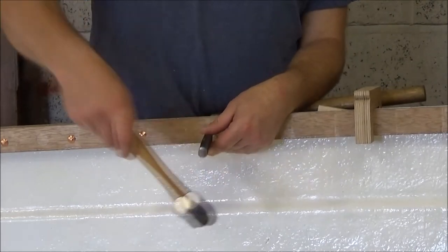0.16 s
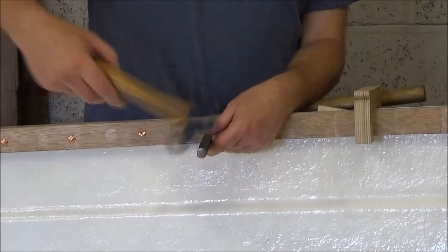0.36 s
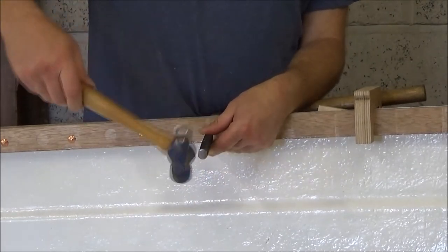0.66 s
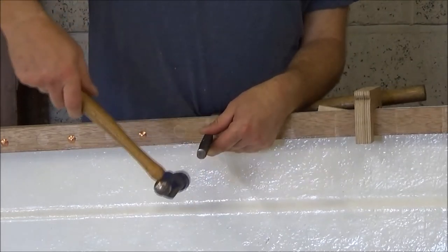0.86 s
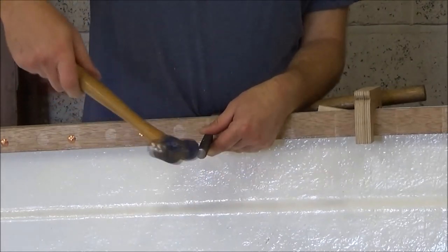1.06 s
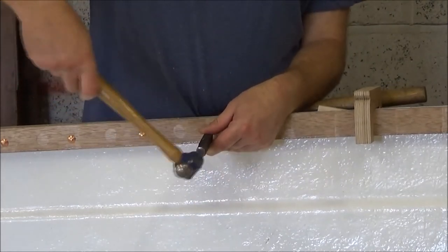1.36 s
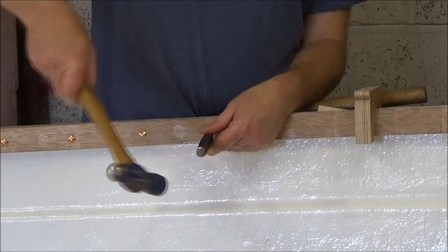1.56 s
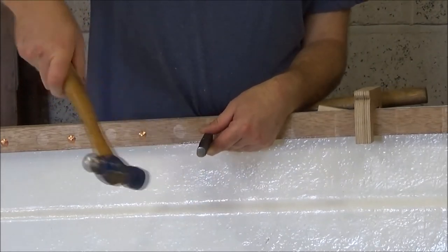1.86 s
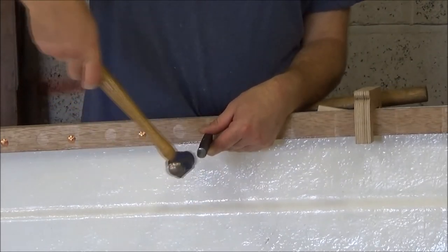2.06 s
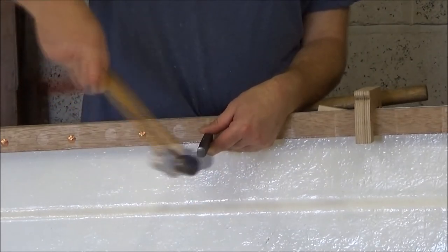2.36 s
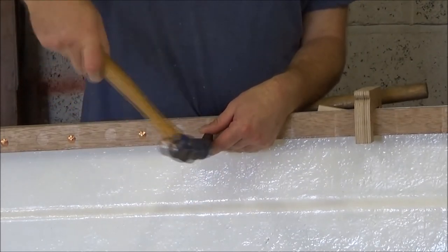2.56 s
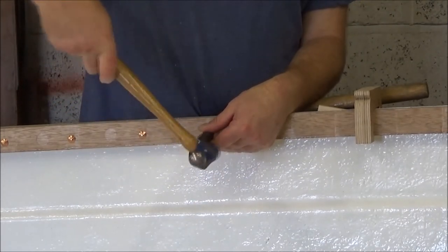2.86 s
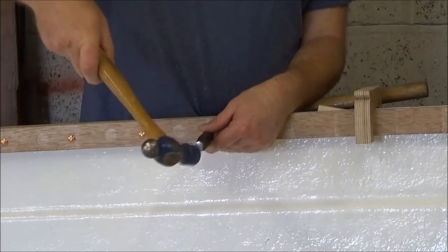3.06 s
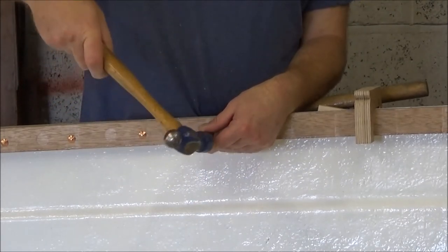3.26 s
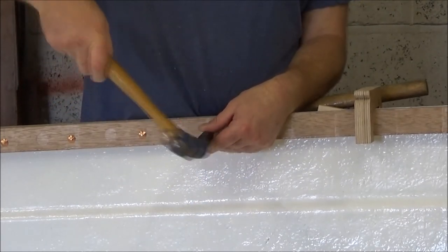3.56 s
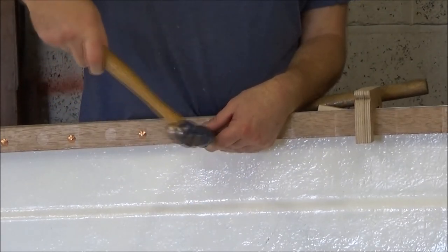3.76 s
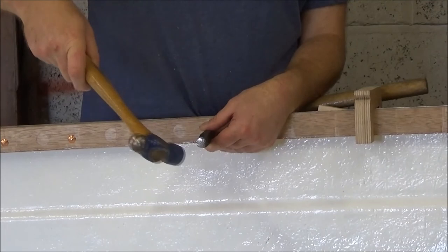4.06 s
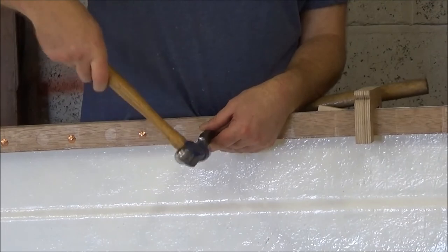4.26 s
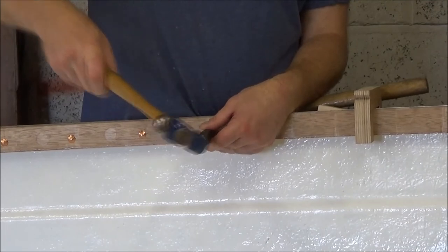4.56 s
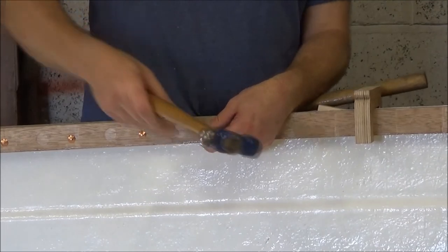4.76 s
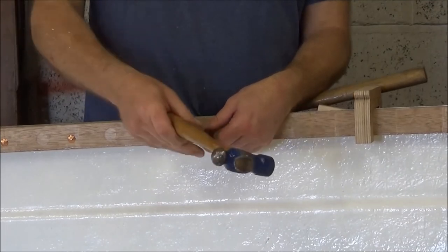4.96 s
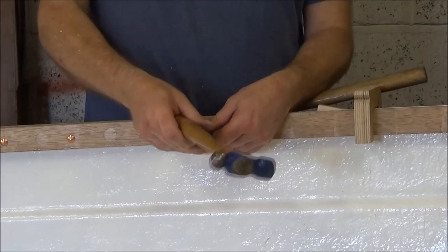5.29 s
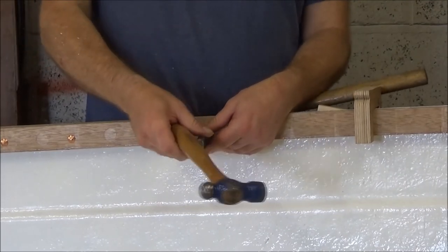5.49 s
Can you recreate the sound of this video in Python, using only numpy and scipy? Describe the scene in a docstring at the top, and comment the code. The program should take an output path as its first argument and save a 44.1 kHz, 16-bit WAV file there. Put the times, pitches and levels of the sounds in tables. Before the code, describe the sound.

In a quiet, hard-walled workshop, hands rub softly on wood, then a hammer lightly taps a steel punch. After a pause come five even, loud, bright metallic blows, each with a wooden knock and short hollow hull boom. Two slower blows follow, then small tool clicks and dull sliding. Close stereo microphones catch a short room tail and faint hiss.

```python
"""Hammering rivets into a boat

In a bare block-walled workshop, hands slide and tools touch; then copper rivets are driven through a hull rail.
A hammer strikes a hand-held steel punch: one light seating tap, five fast blows, two slower ones, more handling.
Contacts are noise bursts shaped by the resonances of wood and metal; the hull's boom is a set of fading sines.
Slides and shop air are coloured noise, with faint camera ticks. A limiter flattens the start of every blow
and keeps part of its cut, so the hiss of the shop steps down as the hammering starts."""
import sys
import numpy as np
from scipy import signal
from scipy.fft import rfft, irfft, next_fast_len
from scipy.io import wavfile

SR = 44100
rng = np.random.default_rng(int(sys.argv[2]) if len(sys.argv) > 2 else 0)


def to_wav(s):
    """Save 16-bit WAV."""
    ch = np.atleast_2d(s).T  # columns
    pcm = np.round(np.clip(ch, -1, 1) * 32767)  # PCM
    wavfile.write(sys.argv[1], SR, pcm.astype(np.int16))


N = 248283
TIME = np.arange(N) / SR
AGE = TIME[:SR]   # seconds since a contact, for one second

# Noise colours, as relative level in each Hz of bandwidth: f/Hz, level/dB
AIR_COLOUR = [(15, -40.5), (25, -5.5), (76, -5.5), (117, -9), (503, -18), (545, -22.5), (677, -18),
              (775, -20.5), (1190, -22), (1480, -26.5), (1740, -28), (4030, -35.5), (16000, -41.5)]
RUB_COLOUR = [(29, -41), (50, -6), (118, 3), (287, 2.5), (433, 1), (523, -3), (1320, -16), (1490, -17.5),
              (2020, -23), (3000, -23.5), (3900, -73), (6600, -120)]
SWISH_COLOUR = [(880, -33), (1500, -7.5), (2030, -18.5), (2890, -9), (5340, -17), (9700, -14.5),
                (15500, -35)]
TAP_COLOUR = [(40, -4.5), (75, 6), (125, 9.5), (180, 22), (250, 22.5), (330, 9.5), (500, 0), (790, 2.5),
              (1500, -6), (2700, -10), (3600, -6), (5300, -13), (7500, -9), (14000, -21.5)]
BLOW_COLOUR = [(30, -16.5), (50, -3.5), (70, 2.5), (120, 2), (200, 15), (290, 10), (500, 5), (1150, -0.5),
               (3300, 0.5), (4500, 3), (5800, -0.5), (8700, 6.5), (11500, -0.5), (14500, -24)]
# How alike the two channels are: f/Hz, correlation (1 = identical)
CHANNEL_LIKENESS = [(50, 1), (125, 1), (300, 0.97), (1000, 0.61), (4000, 0.7), (8000, 0.81), (13000, 1)]
# Room decay before each contact's decay_share scales it: f/Hz, time to fall 60 dB/s
ROOM_DECAY = [(60, 0.73), (200, 0.44), (700, 0.48), (2000, 0.42), (4000, 0.37), (8000, 0.32), (14000, 0.24)]
# Hands sliding on rail or tool: t/s, length/s, relative rub level/dB, relative swish level/dB
SLIDES = [(0.005, 0.067, -47, -63), (0.198, 0.085, -44, -64), (0.974, 0.11, -46.5, -60),
          (4.726, 0.043, -34.5, -49), (4.986, 0.029, -45, -57), (5.215, 0.16, -47, -49),
          (5.373, 0.024, -30, -56), (5.456, 0.11, -35.5, -50)]
# Light contacts of tools and rail: t/s, relative level/dB, thud/dB, brightness/dB, ring f/Hz, ring strength/dB
TAPS = [(0.198, -16, -33, -38, 1110, 10.5), (0.408, -2.5, -3, 3, 7230, 6.5), (4.728, -31.5, -3, 2, 596, 14),
        (5.378, -9, -19, -27.5, 700, 3.5), (5.394, -20, -17, -29, 856, 25),
        (5.478, -22, -12, -11, 1210, -4), (5.503, -22, -13, -19.5, 2900, 24)]
# Hammer on punch: t/s, force/dB, hull boom/dB, rail knock/dB, rail knock f/Hz, steel clink/dB, hammer ring/dB,
# nail f/Hz, punch f/Hz, damping by the grip (resonance width)/Hz, punch overtone f/Hz, punch top mode/dB
BLOWS = [(1.3045, -1, -3.5, 14, 760, 5, -11.5, 1580, 3600, 600, 7100, -14),
         (1.657, 1, -4.5, 8.5, 684, -7, 13, 1608, 4260, 700, 7970, -5),
         (2.0285, -1, -2.5, 2.5, 764, 2.5, 7, 1585, 4650, 500, 7940, 12),
         (2.3993, -1, -1.5, 2, 678, -2.5, 14.5, 1740, 4150, 900, 7740, 0),
         (2.7674, -2, -1.5, 3.5, 744, -7, -7, 2390, 4000, 180, 8050, 9.5),
         (3.6097, -3.5, -10.5, 8, 780, -1.5, -8.5, 2660, 4145, 95, 7480, 10),
         (4.259, 1, -5, 13.5, 1012, -9, 9, 2540, 4300, 800, 8000, 12)]
# Short resonances of steel and copper in contact: f/Hz, width/Hz, strength/dB
CONTACT_MODES = [(1660, 140, -1), (2380, 150, -1.5), (2710, 54, 2.5), (2950, 60, 3), (3220, 42, 2.5),
                 (3850, 42, -5.5), (3990, 27, 3), (4670, 140, -0.5), (4830, 60, -2), (6170, 70, 2),
                 (7370, 70, 2.5), (12940, 340, 15.5)]
# Long-ringing modes of hull and rail: f/Hz, relative level/dB, time to fall 60 dB/s
HULL_MODES = [(69.3, -28, 0.67), (93.8, -25, 0.67), (109.5, -31.5, 0.7), (136, -35, 0.92),
              (146.4, -21, 0.41), (161.3, -22.5, 0.51), (179.3, -23, 0.56), (206.5, -19.5, 0.5),
              (220, -25, .6), (237, -23, 0.49), (284, -31, 0.34), (324.6, -24.5, 0.4), (348, -24.5, 0.49),
              (372, -22, 0.38), (469, -31.5, 0.34), (497, -30.5, 0.43), (531, -30, 0.4), (674, -25, 0.24),
              (691, -31, 0.4), (727, -30.5, .45), (749, -25, 0.44), (822, -38.5, .45), (841, -22.5, 0.27),
              (983, -29, 0.3), (994, -37.5, 0.25)]

SLIDE_ATTACK_S, SLIDE_RELEASE_DB_PER_S = 0.021, 119
HEAD_HZ, HEAD_WIDTH_HZ = 9324, 18   # hammer head
FIRM_GRIP_HZ = 760
OVERTONE_DB, OVERTONE_WIDTH_HZ = 3.5, 420   # the punch's second bending mode
TOP_MODE_HZ, TOP_MODE_WIDTH_HZ = 10880, 380   # and its third
NAIL_DB, NAIL_WIDTH_HZ = 5, 130   # the nail's free length rings higher as it is driven home
CUTOFF_HZ = 16700   # from here up, at least 70 dB is taken off


def from_db(db):
    """Turn decibels into a gain."""
    return 10 ** (np.asarray(db) / 20)


def at_hz(points, hz):
    """Read a table at any frequency, with straight lines along a log-frequency axis."""
    f, value = np.transpose(points)
    return np.interp(np.log(hz + 1e-3), np.log(f), value)


def bump_db(hz, centre_hz, width_hz, db):
    """Lift in dB when a resonance adds its power to a flat response; db is its strength against that response."""
    distance = 2 * (hz - centre_hz) / width_hz
    return 10 * np.log10(1 + from_db(db) ** 2 / (1 + distance ** 2))


def colour(x, db_at):
    """Shape a sound with a causal (minimum-phase) filter whose gain in dB depends on frequency."""
    length = x.shape[-1]
    size = 2 * next_fast_len(length)
    gain = from_db(db_at(np.fft.rfftfreq(size, 1 / SR)))
    cepstrum = irfft(np.log(gain))
    # Folding the cepstrum forward keeps the response from starting early.
    cepstrum[1:size // 2] *= 2
    cepstrum[size // 2 + 1:] = 0
    response = np.exp(rfft(cepstrum))
    return irfft(rfft(x, size) * response)[..., :length]


def diffuse(size):
    """White noise arriving from all sides at a close pair of microphones."""
    mid, side = rfft(rng.standard_normal((2, size)))
    alike = np.clip(at_hz(CHANNEL_LIKENESS, np.fft.rfftfreq(size, 1 / SR)), 0, 1)
    shared = np.sqrt((1 + alike) / 2) * mid
    opposed = np.sqrt((1 - alike) / 2) * side * [[1], [-1]]
    return irfft(shared + opposed, size)


def noise(spectrum):
    """Steady stereo noise of a given colour, scaled to an average (rms) level of 1."""
    x = colour(diffuse(N), lambda hz: at_hz(spectrum, hz))
    return x / x.std()


def add(track, s, sound):
    """Mix a sound into a track from a given second."""
    start = round(s * SR)
    track[:, start:start + sound.shape[-1]] += sound[..., :N - start]


def shop_air(level_db):
    """The quiet hiss of the shop: steady coloured noise."""
    return from_db(level_db) * noise(AIR_COLOUR)


def camera_ticks(level_db, tick_hz, width_hz, tick_s):
    """The camera ticks very faintly, 25 times a second: short fading bursts of noise in one band."""
    since_tick = (TIME - .0095) % .04
    bursts = rng.standard_normal(N) * np.exp(-since_tick / tick_s)
    edges = [tick_hz - width_hz / 2, tick_hz + width_hz / 2]
    band = signal.butter(2, edges, "band", fs=SR, output="sos")
    return from_db(level_db) * signal.sosfilt(band, bursts)


def handling(rub_db, swish_db):
    """Hands rub dully on the rail, cloth and skin swish above; each slide swells, holds and dies in the room."""
    rub, swish = np.zeros((2, N))
    for s, length_s, low_db, high_db in SLIDES:
        swell = np.clip((TIME - s) / SLIDE_ATTACK_S, 0, 1)
        fade = from_db(-SLIDE_RELEASE_DB_PER_S * np.maximum(TIME - s - length_s, 0))
        moving = swell * fade
        rub += moving * from_db(low_db + rub_db)
        swish += moving * from_db(high_db + swish_db)
    return rub * noise(RUB_COLOUR) + swish * noise(SWISH_COLOUR)


def impact(crack_db, crack_s, crack_hz, decay_share, gap_db, bloom_s):
    """A noise impact in the room: a brief bright crack straight ahead, with echoes that die band by band."""
    hz, field = np.fft.rfftfreq(SR, 1 / SR), rfft(diffuse(SR))
    centres, t60s = np.transpose(ROOM_DECAY)
    tail = 0
    for share, t60 in zip(np.eye(len(centres)), t60s):   # each share picks out one band
        band = irfft(field * at_hz(np.c_[centres, share], hz), SR)
        tail = tail + band * from_db(-60 * AGE / (t60 * decay_share))
    # The first reflections lie below or above the settled decay.
    bloom = from_db(gap_db * np.exp(-AGE / bloom_s))
    crack = rng.standard_normal(SR) * from_db(crack_db) * np.exp(-AGE / crack_s)
    highpass = signal.butter(1, crack_hz, "high", fs=SR, output="sos")
    return bloom * tail + signal.sosfilt(highpass, crack)


def tap_db(hz, thud_db, bright_db, ring_hz, ring_db):
    """A light contact: a wooden thud, a little steel on top and one ring that depends on the spot touched."""
    thud = thud_db / (1 + (hz / 380) ** 4)
    steel = bright_db * hz / (hz + 1500)
    ring_width_hz = 95 * (1 + (ring_hz / 5000) ** 4)   # wider means shorter: the highest rings die sooner
    return at_hz(TAP_COLOUR, hz) + thud + steel + bump_db(hz, ring_hz, ring_width_hz, ring_db)


def taps(level_db):
    """The punch is seated on the nail; later the tools touch each other and the rail."""
    out = np.zeros((2, N))
    for s, db, *timbre in TAPS:
        touch = impact(crack_db=5.5, crack_s=0.007, crack_hz=119.4, decay_share=0.73, gap_db=10.0, bloom_s=0.0073)
        touch = colour(touch, lambda hz: tap_db(hz, *timbre))
        add(out, s, from_db(level_db + db) * touch)
    return out


def chatter_db(hz, strength, within_s, count=6):
    """Punch and nail rebound a few times within milliseconds, which ripples each blow's spectrum differently."""
    delays = within_s * rng.random(count)
    rebounds = np.exp(-2j * np.pi * np.outer(hz, delays)).sum(axis=1)
    return 20 * np.log10(np.abs(1 + strength * rebounds))


def low_boom_db(hz, boom_db):
    """The hull's boom colours the low end and fades out above about 450 Hz."""
    return boom_db / (1 + (hz / 450) ** 2)


def blow_db(hz, boom_db, knock_db, knock_hz, clink_db, ring_db, nail_hz, punch_hz, damping_hz, overtone_hz, top_db):
    """Response of hull, rail, punch, nail and hammer head to one blow, as a sum of lifts and dips in dB."""
    hull = low_boom_db(hz, boom_db)
    rail = bump_db(hz, knock_hz, 0.27 * knock_hz, knock_db)
    steel = clink_db * hz ** 2 / (hz ** 2 + 5500 ** 2)
    punch = bump_db(hz, punch_hz, damping_hz, 20 * np.log10(FIRM_GRIP_HZ / damping_hz))
    punch = punch + bump_db(hz, overtone_hz, OVERTONE_WIDTH_HZ, OVERTONE_DB)
    punch = punch + bump_db(hz, TOP_MODE_HZ, TOP_MODE_WIDTH_HZ, top_db)
    copper = bump_db(hz, nail_hz, NAIL_WIDTH_HZ, NAIL_DB)
    head = bump_db(hz, HEAD_HZ, HEAD_WIDTH_HZ, ring_db)   # the hammer head's own thin ring
    body = sum(bump_db(hz, *mode) for mode in CONTACT_MODES)
    chatter = chatter_db(hz, strength=.12, within_s=.007) * hz / (hz + 500)   # weaker in the lows
    return at_hz(BLOW_COLOUR, hz) + hull + rail + steel + punch + copper + head + body + chatter


def hull_ring(boom_db, uneven_db, spread_rad, spread_hz, swell_s):
    """The blow spreads through the hull as fading sines; higher modes differ more in phase between microphones."""
    out = 0
    for hz, db, t60 in HULL_MODES:
        strength_db = db + low_boom_db(hz, boom_db) + rng.normal(0, uneven_db)
        spread = spread_rad * min(hz / spread_hz, 1) ** 2
        phase = rng.uniform(0, 2 * np.pi) + spread * rng.standard_normal((2, 1))
        out = out + from_db(strength_db - 60 * AGE / t60) * np.sin(2 * np.pi * hz * AGE + phase)
    return out * (1 - np.exp(-AGE / swell_s))


def hammering(level_db, hull_db, bite_s):
    """Each blow sends a coloured impact into the room and leaves the hull ringing."""
    out = np.zeros((2, N))
    bite = (1 - np.exp(-AGE / bite_s)) ** 3   # the force builds as the punch takes up the slack on the nail
    for s, force_db, boom_db, *timbre in BLOWS:
        strike = impact(crack_db=9, crack_s=0.004, crack_hz=5500, decay_share=0.9, gap_db=-6.5, bloom_s=.01)
        strike = colour(bite * strike, lambda hz: blow_db(hz, boom_db, *timbre))
        hull = hull_ring(boom_db, uneven_db=1.5, spread_rad=0.81, spread_hz=230, swell_s=0.02)
        add(out, s, from_db(force_db) * (from_db(level_db) * strike + from_db(hull_db) * hull))
    return out


def scene():
    """The work at the rail over the quiet air of the shop."""
    quiet = shop_air(level_db=-52)
    quiet = quiet + camera_ticks(level_db=-46.5, tick_hz=3050, width_hz=1400, tick_s=0.0045)
    work = handling(rub_db=-4.0, swish_db=-5.5) + taps(level_db=-11.5)
    work = work + hammering(level_db=0, hull_db=11, bite_s=0.00038)
    return (work + quiet) * from_db([[-.2], [.2]])   # the second channel is slightly louder


def hold(db, release_db_per_s):
    """Follow every rise at once, then sink at a steady rate (a negative rate creeps upward)."""
    return np.maximum.accumulate(db + release_db_per_s * TIME) - release_db_per_s * TIME


def smooth(x, time_s):
    """Running average with a memory of the given length."""
    keep = np.exp(-1 / (time_s * SR))
    return signal.lfilter([1 - keep], [1, -keep], x)


def limiter(x, ceiling_db, release_db_per_s, lasting_share, lasting_db_per_s, sense_s, attack_s):
    """Turn down quickly when the level passes the ceiling; most of the cut recovers fast, a share of it lasts."""
    level_db = 10 * np.log10(smooth(np.mean(x ** 2, axis=0), sense_s) + 1e-12)
    over_db = np.maximum(level_db - ceiling_db, 0)
    brief_db = hold(over_db, release_db_per_s)
    lasting_db = hold(lasting_share * over_db, lasting_db_per_s)
    cut_db = smooth(np.maximum(brief_db, lasting_db), attack_s)
    ahead_s = .002   # the cut comes this much early
    return x * from_db(-np.interp(TIME + ahead_s, TIME, cut_db))


def record(dry):
    """The limiter holds the blows down; then the highest treble is cut."""
    # The negative lasting rate makes the lasting cut deepen very slowly.
    held = limiter(dry, ceiling_db=-25.0, release_db_per_s=262, lasting_share=0.38, lasting_db_per_s=-0.08,
                   sense_s=0.0018, attack_s=.0003)
    lowpass = signal.cheby2(12, 70, CUTOFF_HZ, fs=SR, output="sos")
    return signal.sosfilt(lowpass, held)


dry = scene()
out = record(dry)
to_wav(out)
```